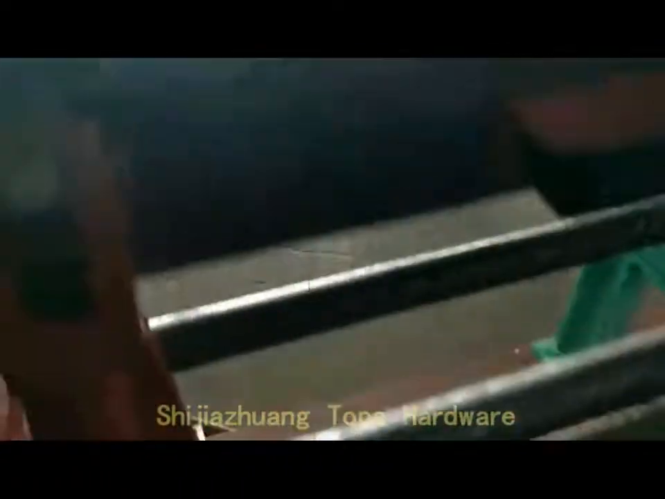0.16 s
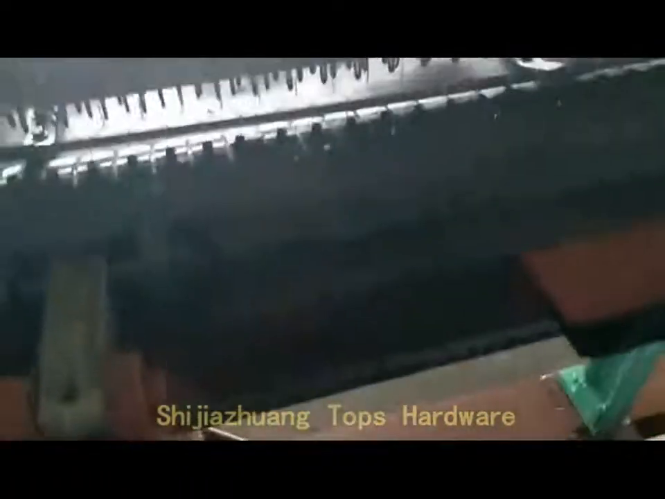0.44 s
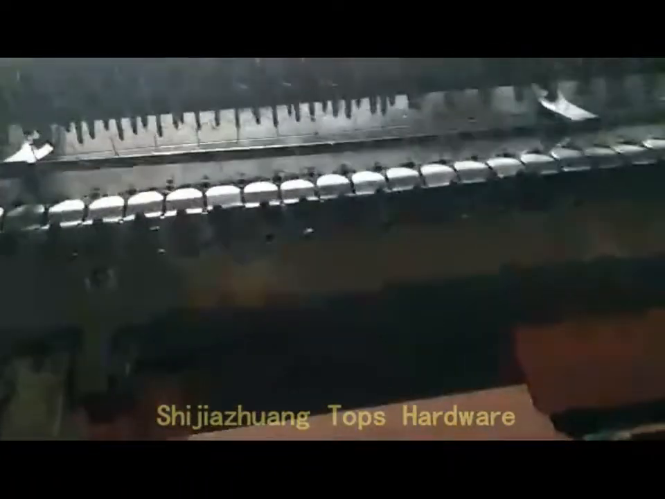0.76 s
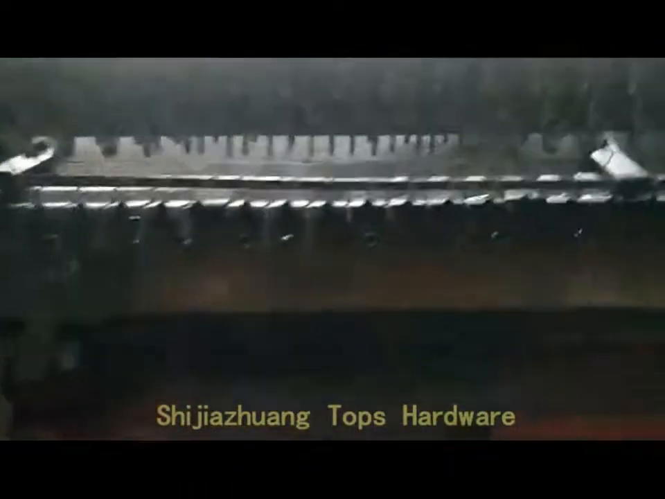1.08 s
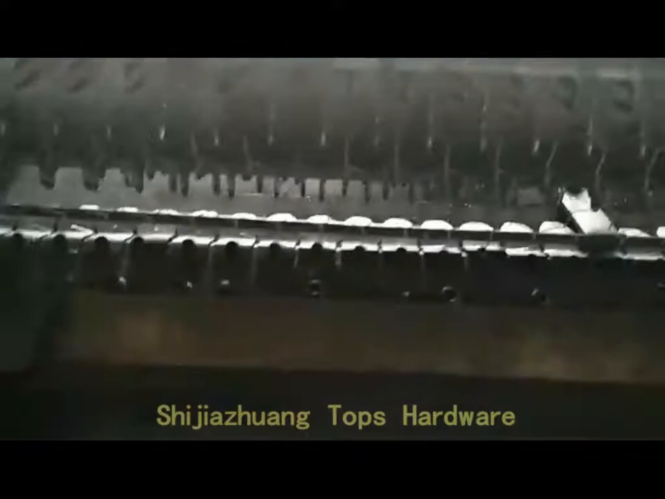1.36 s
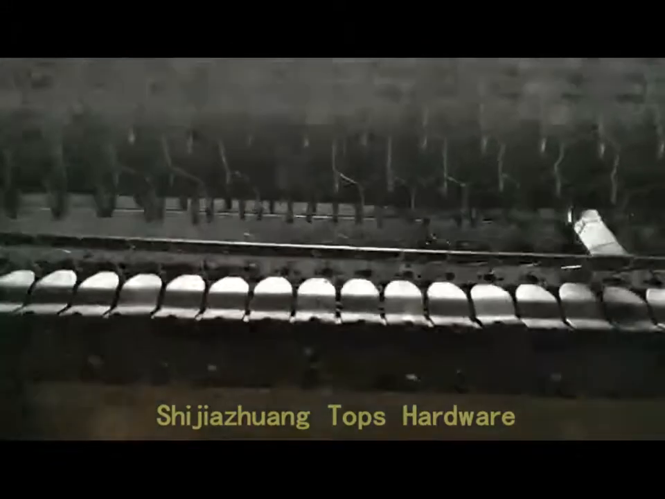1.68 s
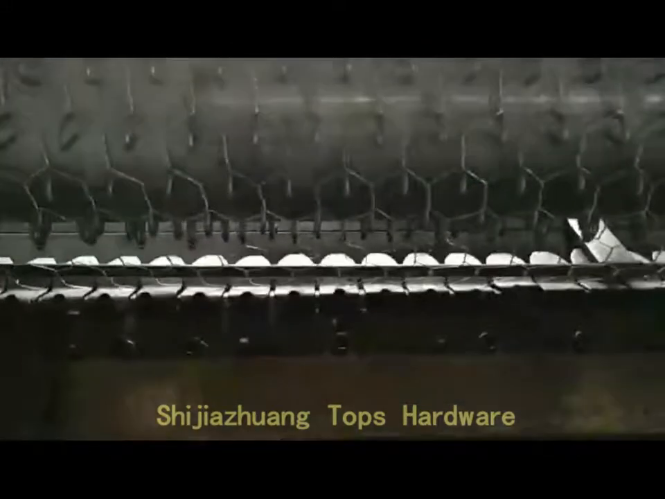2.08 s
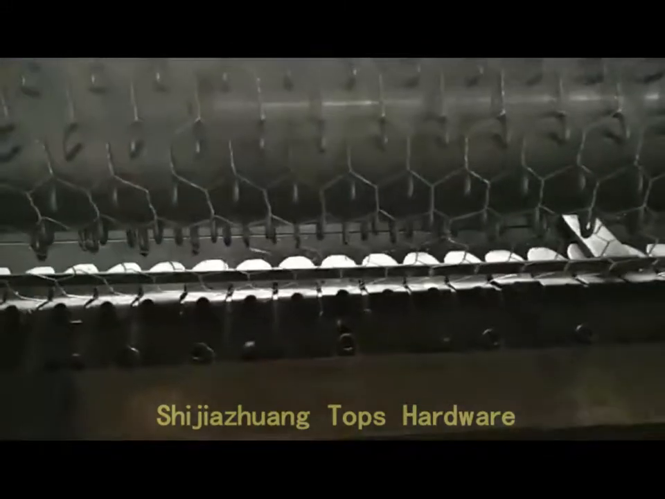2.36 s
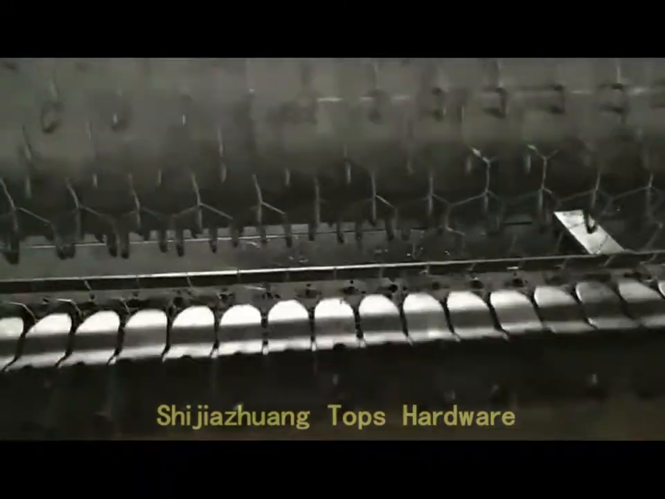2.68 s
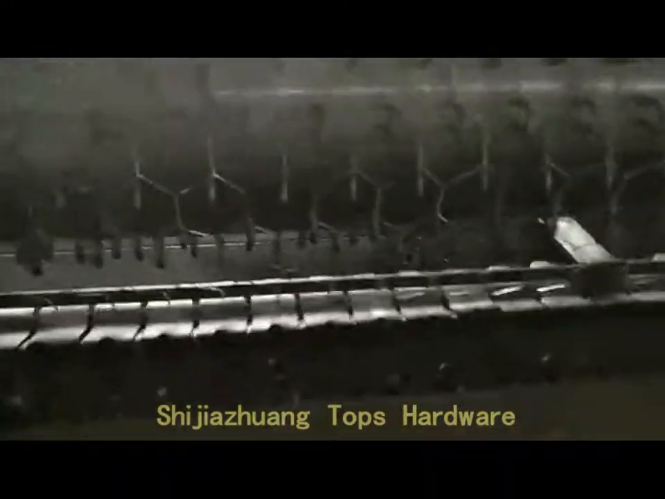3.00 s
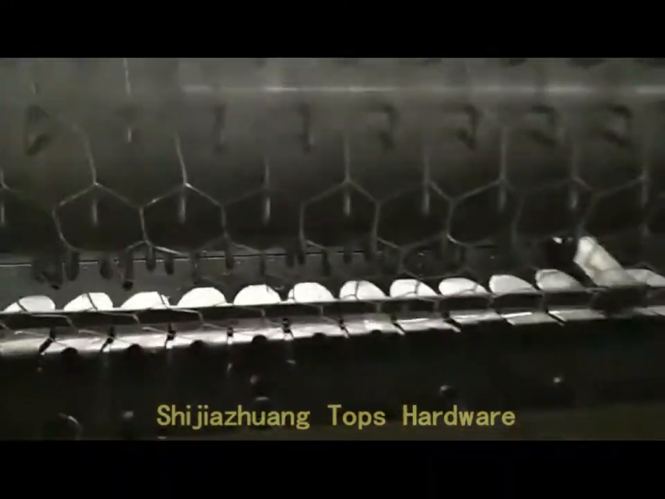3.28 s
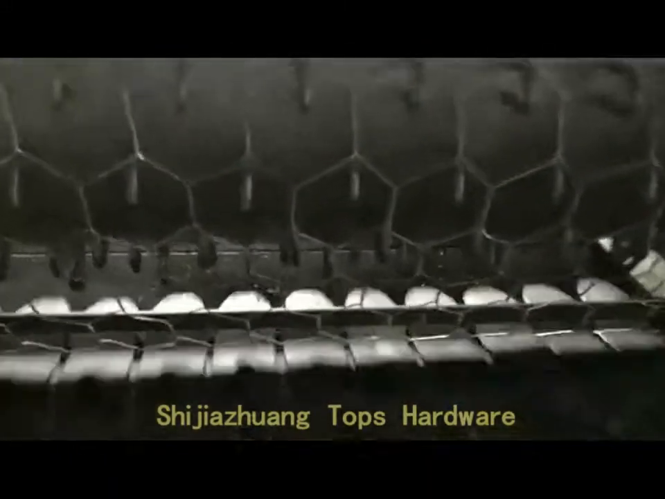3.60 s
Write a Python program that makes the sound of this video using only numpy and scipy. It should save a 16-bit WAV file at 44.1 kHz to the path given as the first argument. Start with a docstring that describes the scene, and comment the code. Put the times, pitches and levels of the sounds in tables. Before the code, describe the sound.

A wire mesh weaving machine repeats a grinding, rattling stroke about every second, then a bright steel clank with a quick bounce and fading knocks, heard close in a factory hall over low motor drone.

```python
"""A wire netting machine in a factory hall, heard from close by over the low drone of motor and floor.
Wire slides and hisses, then a twisting stroke rattles the gears, shakes the frame and knocks.
Next a steel stop clanks and bounces: the microphone lurches and goes briefly deaf.
The return stroke knocks and fades, small parts tap now and then, and the next turn begins.
Noise and clicks through resonances make frame, gears and rattle; fading sine waves make thuds and clanks."""
import sys
import numpy as np
from scipy import signal
from scipy.fft import rfft, irfft, next_fast_len
from scipy.io import wavfile

SR = 44100
rng = np.random.default_rng(int(sys.argv[2]) if len(sys.argv) > 2 else 0)


def dump_mix(stems):
    """Bounce the given channels to the path in sys.argv[1] as a 16-bit WAV at rate SR."""
    frames = np.atleast_2d(stems).T  # one column per channel
    limited = np.clip(frames, -1, 1)  # hard clip at full scale
    pcm = np.round(limited * 32767).astype(np.int16)
    wavfile.write(sys.argv[1], SR, pcm)


N = 164934

# Twisting strokes, with trims of that turn: (start [s], frame [dB], grind [dB], rattle [dB], left over right [dB])
STROKES = [(-0.946, -4, 3, -1, -1), (0.1, -3.5, 2, -3.5, -1), (1.15, -2.5, -1, 0, -1),
           (2.189, -2, 1, 1, -2), (3.237, -.6, 0, 1, -1)]
# Loudness through one turn: (time after its start [s], frame [dB], grind [dB], rattle [dB])
TURN_SHAPE = [(0, -15, -23, -17), (.06, -17, -25, -18), (.3, -19, -24, -17), (.33, -17, -26, -18),
              (.52, -16, -30, -24), (.56, -16, -29, -21), (.62, -15, -29, -24), (.69, -16, -33, -29),
              (.73, -23, -35, -32), (.9, -25, -38, -36), (1.03, -27, -38, -35)]
# Wire slides before a stroke: (start [s], time until the fade [s], rattle [dB], treble [dB], thrum of frame [dB])
WIRE_SLIDES = [(-.03, .13, -23, -44, -32), (1.0, .14, -36, -48, -36), (2.037, .15, -19, -36, -24),
               (3.11, .1, -20, -38, -32)]
SLIDE_RISE_S, SLIDE_FALL_S = .04, .04

# Knocks of gears and levers: (time [s], pitch of thud [Hz], thud [dB], clack [dB], ring [dB])
GEAR_KNOCKS = [(0.108, 310, -6, -15, -18), (0.495, 420, -4, -15, -17), (0.605, 360, -6, -15, -22),
               (0.729, 340, -6, -21, -25), (1.153, 300, -9, -20, -13), (1.185, 330, -9, -22, -14),
               (1.219, 240, -12, -21, -16), (1.698, 300, -14, -23, -19), (1.747, 330, -9, -14, -27),
               (1.787, 280, -6, -26, -27), (1.822, 320, -7, -28, -27), (2.187, 315, -7, -15, -11),
               (2.581, 220, -14, -23, -19), (2.743, 300, -10, -21, -14), (2.785, 323, -6, -15, -24),
               (2.845, 300, -8, -17, -24), (3.239, 320, -8, -17, -13), (3.303, 240, -9, -25, -12),
               (3.331, 240, -5, -28, -18), (3.393, 220, -6, -28, -18), (3.44, 200, -6, -26, -18),
               (3.628, 450, -3, -15, -17)]
# How long a knock takes to fall 60 dB: (thud [s], clack [s], ring [s])
KNOCK_FADES = (.15, .06, .05)
THUD_RISE_S, THUD_SPREAD_OCT, THUD_SHAKE_DB = .003, .6, -7
# Tone of a knock's clack: (frequency [Hz], level [dB])
CLACK_TONE = [(500, -20), (800, 0), (1900, -3), (3000, -14), (6000, -35)]

# Resonances of the frame: (frequency [Hz], width [Hz], level before the groan [dB])
FRAME_MODES = [(187, 18, -3), (222, 18, -2), (245, 16, -1), (305, 25, -2), (349, 16, 2), (458, 30, -8),
               (560, 60, -9), (680, 70, -10), (870, 70, -7)]
# Smooth rumble under those resonances: (frequency [Hz], level [dB])
FRAME_RUMBLE, FRAME_RUMBLE_DB = [(70, -40), (110, -10), (230, 0), (480, -7), (900, -12), (1050, -22),
                                 (2500, -50)], -5
# The frame's groan starts high and sinks during the stroke
GROAN_DB_PER_OCT, GROAN_SINKS_S = 11, .33

# Tone of the grinding gears: (frequency [Hz], level [dB])
GRIND_TONE = [(900, -3), (1240, -7), (2000, -2), (2700, -5), (3400, -8)]
# Tone of the rattling parts: (frequency [Hz], level [dB])
RATTLE_TONE = [(3200, -11), (3950, -5), (4350, -6), (4850, 0), (5800, 0), (6300, -3), (6920, -14),
               (7600, -20)]
# The rattle brightens as the listener leans in: (time [s], tilt [dB per octave])
LEANING_IN = [(0, -9), (.9, -6), (1.9, 5)]
RATTLE_TREBLE_DB, RATTLE_TOP_HZ = -30, 7200
# A rasping band, lost as the rattle brightens; its level is before that change
RASP_HZ, RASP_WIDTH_HZ, RASP_DB = 4000, 450, -14
# Tone of the hissing treble: (frequency [Hz], level [dB])
TREBLE_TONE = [(6000, -25), (7000, -4), (8020, -13), (9070, -6), (10600, -12), (12200, -6), (14700, -10),
               (15800, -16)]

# Hits on the stop: (time [s], strength [dB], left over right [dB], lurch on the left [relative],
# lurch on the right [relative], deafness before shaping [dB], body [dB], jangle [dB])
STOP_HITS = [(.4, -2, -3, .22, .15, 6, -14, -18), (1.4486, -4, -4, .045, .34, 14, -16, -28),
             (2.4947, -6, -4, .04, .32, 9, -16, -26), (3.5404, -4, -3, .2, .002, 6, -14, -22)]
# The stop bounces once after each hit: (time [s], strength [dB])
STOP_BOUNCES = [(0.4234, -6), (1.4714, -21), (2.5172, -15), (3.5633, -7)]
# Ringing modes of the stop: (frequency [Hz], level before chance [dB], time to fall 60 dB [s])
STOP_MODES = [(2800, -3, .05), (3250, -4, .05), (6060, -8, .06), (9006, -4, .05), (9800, -12, .04),
              (12170, 2.5, .05), (13770, -10, .04)]
CLANK_DB = -6
CRASH_DB, CRASH_T60_S = -8, .05
SHIMMER_DB, SHIMMER_T60_S, SHIMMER_WIDTH_HZ, SHIMMER_BED_DB = -15, .55, 400, -11
BODY_T60_S, JANGLE_T60_S = .08, .9

# Bright taps of small parts: (time [s], strength [dB], tail against strength [dB])
SMALL_TAPS = [(0.1002, -21, -13.0), (0.626, -17, -20.0), (1.1498, -13, -20.0), (1.1644, -22, -20.0),
              (1.6686, -16, -20.0), (2.2029, -19, -20.0), (2.2293, -14, -20.0), (3.2375, -9, -20.0),
              (3.249, -8, -20.0)]
# Tone of a tap's crack: (frequency [Hz], level [dB])
TAP_TONE = [(1000, -30), (3360, -13), (5590, -3), (7810, -16), (15800, -14)]
TAP_T60_S, TAP_TAIL_T60_S, TAP_DB, TAP_PAN_DB = .03, .4, -3, -3.0

# Low tone of motor and floor: (frequency [Hz], level [dB])
DRONE_TONE, DRONE_DB = [(20, -18), (35, -17), (70, -4), (120, -7), (160, -2), (230, -30), (400, -70)], -28
# How alike left and right are: (frequency [Hz], likeness [-1 to 1])
LEFT_RIGHT_LIKENESS = [(120, .94), (250, .92), (500, .65), (1000, -.1), (3000, .0), (10000, .1)]

# The microphone
LURCH_DROP_S, LURCH_BACK_S = .006, .04
LURCH_SWING, LURCH_RISE_S, LURCH_FALL_S = 1.1, .08, .1
DEAF_ONSET_S, DEAF_RECOVERY_S = .012, .09
CLIP_AT, CUTOFF_HZ = .99, 16000


def machine():
    """Frame, gears and wire guides are shaken by each stroke and struck by single knocks and slides."""
    frame_gain, grind_gain, rattle_gain, groan, pan = turn_levels()
    treble_gain = rattle_gain * amp(RATTLE_TREBLE_DB)
    at, _, *levels = np.transpose(GEAR_KNOCKS)
    thud, clack_gain, ring = [blows(zip(at, db), t60) for db, t60 in zip(levels, KNOCK_FADES)]
    # a knock also shakes the frame and the rattling parts
    frame_gain = np.hypot(frame_gain, amp(THUD_SHAKE_DB) * thud)
    rattle_gain = np.hypot(rattle_gain, ring)
    slide_frame, slide_grind, slide_rattle, slide_treble = slide_levels()
    shaken_frame = (frame_gain + slide_frame) * frame(groan)
    grind = chatter(GRIND_TONE, count=18, width_share=.07, patchy_db=2.5, per_s=2500)
    gears = (grind_gain + slide_grind) * grind + (rattle_gain + slide_rattle) * rattle()
    gears = flicker(60, spread_db=1.1) * gears
    clack = clack_gain * coloured(hiss_pair(), CLACK_TONE)
    treble = coloured(hiss_pair(), TREBLE_TONE) * flicker(15, spread_db=3.0)
    dull = signal.butter(6, RATTLE_TOP_HZ, fs=SR, output="sos")
    lower = signal.sosfilt(dull, shaken_frame + thuds() + gears + clack)
    return pan * (lower + (treble_gain + slide_treble) * treble)


def turn_levels():
    """The stroke drives frame, grind and rattle alike in every turn, with slow trims between turns."""
    t = np.arange(N) / SR
    start, *trims, pan_db = np.transpose(STROKES)
    after, *levels = np.transpose(TURN_SHAPE)
    age = t - start[np.searchsorted(start, t, "right") - 1]
    gains = []
    for db, trim in zip(levels, trims):
        gains.append(amp(np.interp(age, after, db) + np.interp(t, start + .5, trim)))
    groan = GROAN_DB_PER_OCT * np.cos(np.pi * np.minimum(age / GROAN_SINKS_S, 2))
    return *gains, groan, sides(np.interp(t, start + .5, pan_db))


def slide_levels():
    """Sliding wire adds to frame, grind, rattle and treble, rising and fading in straight lines."""
    t = np.arange(N) / SR
    extra = np.zeros((4, N))
    for s, length, level_db, treble_db, thrum_db in WIRE_SLIDES:
        rise, fall = (t - s) / SLIDE_RISE_S, (s + length - t) / SLIDE_FALL_S + 1
        shape = np.clip(np.minimum(rise, fall), 0, 1)
        extra += np.outer(amp([thrum_db, level_db - 9, level_db, treble_db]), shape)
    return extra


def frame(groan):
    """Uneven jolts ring the frame's resonances over a smooth rumble; the groan tilts their balance."""
    jolts = grains(per_s=400, spread_db=2.5, smooth=.9) * flicker(18, spread_db=1.1)
    modes = 0
    for k, (hz, width, db) in enumerate(FRAME_MODES):
        gain = amp(db + groan * np.log2(min(hz, 400) / 270)) / np.sqrt(width)
        modes = modes + (-1) ** k * gain * resonant(jolts, hz, width)
    rumble = coloured(jolts[::-1], FRAME_RUMBLE)
    return rms_one(coloured(modes, None) + amp(FRAME_RUMBLE_DB) * rumble)


def thuds():
    """Each knock rings the frame's modes that lie near its pitch."""
    t, out = np.arange(SR // 4) / SR, np.zeros(N + SR)
    hz, _, level_db = np.transpose(FRAME_MODES)
    waves = np.sin(2 * np.pi * np.outer(hz, t))
    shape = (1 - np.exp(-t / THUD_RISE_S)) * amp(-60 * t / KNOCK_FADES[0])
    for s, pitch_hz, db, *_ in GEAR_KNOCKS:
        share = amp(level_db) * np.exp(-(np.log2(hz / pitch_hz) / THUD_SPREAD_OCT) ** 2)
        first = int(s * SR)
        out[first:first + len(t)] += amp(db) * shape * (share / share.sum() @ waves)
    return out[:N]


def rattle():
    """Many loose parts chatter and brighten, while a rasping band of noise is lost."""
    tilt_db = np.interp(np.arange(N) / SR, *np.transpose(LEANING_IN))
    parts = chatter(RATTLE_TONE, count=20, width_share=.05, patchy_db=2.6, per_s=4000, tilt_db=tilt_db)
    rasp = rms_one(resonant(hiss_pair(), RASP_HZ, RASP_WIDTH_HZ))
    return parts + amp(RASP_DB - tilt_db) * rasp


def chatter(spectrum, count, width_share, patchy_db, per_s, tilt_db=0):
    """Clicks shake many small parts, each a resonance that comes and goes on its own; average level 1."""
    clicks = grains(per_s, spread_db=3.0, smooth=1.2)
    low, *_, high = np.transpose(spectrum)[0]
    centres = np.geomspace(low, high, count) * np.exp(.01 * rng.standard_normal(count))
    total = 0
    for k, hz in enumerate(centres):
        tilt = amp(tilt_db * np.log2(hz / np.sqrt(low * high)))
        gain = amp(at_hz(spectrum, hz)) * flicker(9, patchy_db) * tilt
        total = total + (-1) ** k * gain * resonant(clicks, hz, width_share * hz)
    return coloured(total, None)


def stop():
    """Hit and bounce crash and ring the steel; a noisy shimmer hangs on and loose parts jangle after a hit."""
    hits = [(s, db) for s, db, *_ in STOP_HITS] + list(STOP_BOUNCES)
    at, _, pan_db, *_, body_db, jangle_db = np.transpose(STOP_HITS)
    loose = coloured(grains(per_s=2500, spread_db=3.0, smooth=.8), GRIND_TONE[:-1] + RATTLE_TONE)
    loose = loose * (blows(zip(at, body_db), BODY_T60_S) + blows(zip(at, jangle_db), JANGLE_T60_S))
    crash_gain = amp(CRASH_DB) * blows(hits, CRASH_T60_S)
    shimmer_gain = amp(SHIMMER_DB) * blows(hits, SHIMMER_T60_S)
    pan = sides(np.interp(np.arange(N) / SR, at, pan_db))
    return pan * (stop_ring(hits) + loose + stop_shimmer() * (crash_gain + shimmer_gain))


def stop_ring(hits):
    """Every hit starts the steel's modes as fading sine waves, with some chance in level and phase."""
    t, out = np.arange(SR // 10) / SR, np.zeros((2, N + SR))
    for s, db in hits:
        level_luck, phase_luck = rng.standard_normal((2, len(STOP_MODES)))
        ring = 0
        for k, (hz, level, t60) in enumerate(STOP_MODES):
            phase = [[0], [1.4 * phase_luck[k]]]  # left and right differ
            fade = amp(level + 3 * level_luck[k] - 60 * t / t60)
            ring = ring + fade * np.sin(2 * np.pi * hz * t + phase)
        first = int(s * SR)
        out[:, first:first + len(t)] += amp(db + CLANK_DB) * ring
    return out[:, :N]


def stop_shimmer():
    """Noise through the stop's upper modes, each flickering, over a smooth bed of treble."""
    noise = hiss_pair()
    shimmer = 0
    for hz, level, _ in STOP_MODES[2:]:
        wander = flicker(22, spread_db=2.5)
        shimmer = shimmer + amp(level) * wander * resonant(noise, hz, SHIMMER_WIDTH_HZ)
    return rms_one(shimmer + amp(SHIMMER_BED_DB) * coloured(noise[::-1], TREBLE_TONE))


def taps():
    """Each tap of a small part is a short bright crack of noise with a hissing tail."""
    at, strength_db, tail_db = np.transpose(SMALL_TAPS)
    crack = coloured(hiss_pair(), TAP_TONE) * blows(zip(at, strength_db + TAP_DB), TAP_T60_S)
    tail = coloured(hiss_pair(), TREBLE_TONE) * blows(zip(at, strength_db + tail_db), TAP_TAIL_T60_S)
    return sides(TAP_PAN_DB) * (crack + tail)


def drone():
    """Motor and floor hum on as steady low noise."""
    return amp(DRONE_DB) * coloured(hiss_pair(), DRONE_TONE)


def amp(db):
    """Turns decibels into a factor."""
    return 10 ** (np.asarray(db) / 20)


def rms_one(x):
    """Scales a sound to an average (rms) level of 1."""
    return x / np.sqrt(np.mean(x ** 2) + 1e-20)


def at_hz(points, hz):
    """Reads a tone table at any frequency, in straight lines over log frequency."""
    known_hz, values = np.array(points).T
    return np.interp(np.log(hz), np.log(known_hz), values)


def hiss_pair():
    """Two unrelated streams of plain noise."""
    return rng.standard_normal((2, N))


def grains(per_s, spread_db, smooth):
    """Two unrelated streams of uneven clicks over a share of smooth noise."""
    sizes = amp(spread_db * np.minimum(rng.exponential(1, (2, N)), 4)) * rng.choice([-1, 1], (2, N))
    clicks = sizes * (rng.random((2, N)) < per_s / SR)
    return rms_one(clicks) + smooth * hiss_pair()


def coloured(pair, spectrum):
    """Gives two streams a tone and spreads them to left and right; average level 1."""
    size = next_fast_len(N + 4096)
    hz = np.maximum(np.arange(size // 2 + 1) * SR / size, 1)
    mid, side = rfft(pair, size) * (amp(at_hz(spectrum, hz)) if spectrum else 1)
    alike = np.clip(at_hz(LEFT_RIGHT_LIKENESS, hz), -.99, .99)
    both = np.sqrt(1 + alike) * mid + np.sqrt(1 - alike) * side * [[1], [-1]]
    return rms_one(irfft(both, size)[:, :N])


def resonant(x, hz, width_hz):
    """One resonance: it rings at a frequency, longer when the width is small."""
    r = np.exp(-np.pi * width_hz / SR)
    feedback = [1, -2 * r * np.cos(2 * np.pi * hz / SR), r * r]
    return signal.lfilter([(1 - r * r) / 2, 0, (r * r - 1) / 2], feedback, x)


def sides(pan_db):
    """Factors for left and right; a positive value makes the left louder."""
    return amp(np.reshape([pan_db / 2, -pan_db / 2], (2, -1)))


def flicker(rate, spread_db):
    """A gain that wanders by chance; a higher rate [Hz] wanders faster."""
    r = np.exp(-80 * np.pi * rate / SR)  # one step is 40 samples
    slow = signal.lfilter([1], [1, -2 * r, r * r], rng.standard_normal(N // 40 + 1002))[1000:]
    return np.interp(np.arange(N) / 40, np.arange(len(slow)), amp(spread_db * rms_one(slow)))


def blows(rows, t60):
    """A gain that jumps at each (time [s], level [dB]) and falls 60 dB in t60 seconds."""
    clicks = np.full(N, 1e-12)
    for s, db in rows:
        clicks[int(s * SR)] += amp(db)
    return signal.lfilter([1], [1, -amp(-60 / (t60 * SR))], clicks)


def scene():
    """Machine, stop, taps and drone sound together."""
    return machine() + stop() + taps() + drone()


def record(dry):
    """At each clank the microphone's rest position drops, swings over and settles, and it hears less; peaks clip."""
    deaf_db, lurch = np.zeros(N), np.zeros((2, N))
    for s, _, _, left, right, db, *_ in STOP_HITS:
        age = np.maximum(np.arange(N) / SR - s, 0)
        deaf_db += db * 1.5 * (np.exp(-age / DEAF_RECOVERY_S) - np.exp(-age / DEAF_ONSET_S))
        drop = (1 - np.exp(-age / LURCH_DROP_S)) * np.exp(-age / LURCH_BACK_S)
        swing = LURCH_SWING * (1 - np.exp(-(age / LURCH_RISE_S) ** 2)) * np.exp(-age / LURCH_FALL_S)
        lurch += np.outer([left, right], 2 * swing - 2 * drop)
    wet = np.clip(dry * amp(-deaf_db) + lurch, -CLIP_AT, CLIP_AT)
    # nothing much is left above the cutoff
    return signal.sosfilt(signal.cheby2(30, 80, CUTOFF_HZ, fs=SR, output="sos"), wet)


dry = scene()
out = record(dry)
dump_mix(out)
```